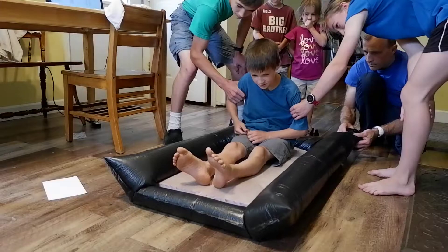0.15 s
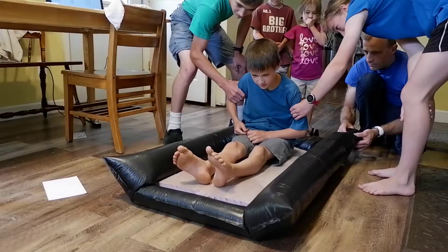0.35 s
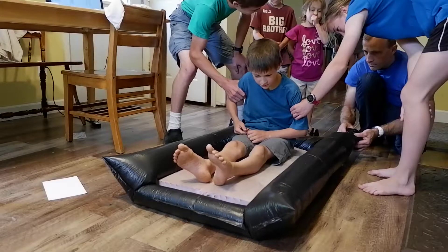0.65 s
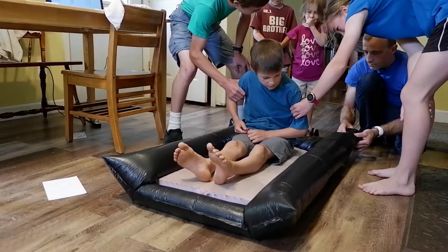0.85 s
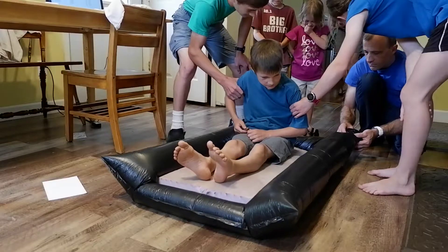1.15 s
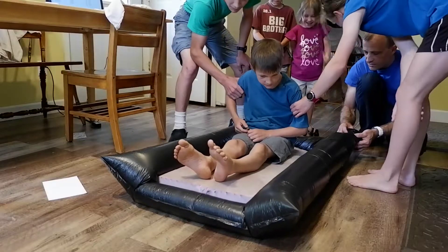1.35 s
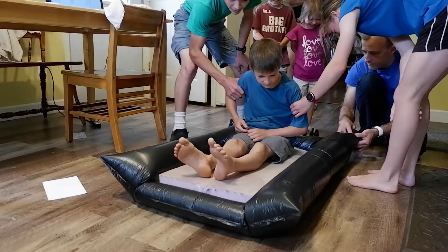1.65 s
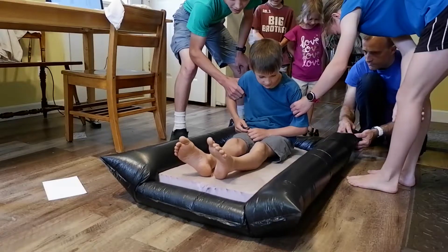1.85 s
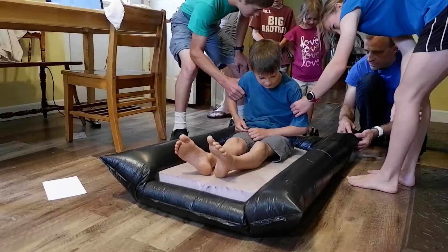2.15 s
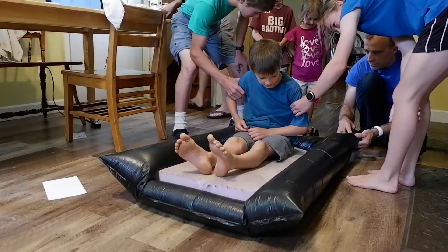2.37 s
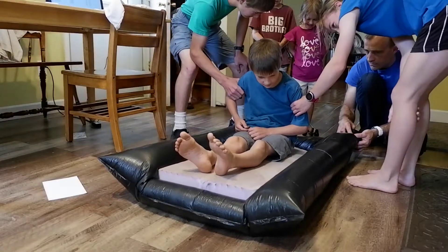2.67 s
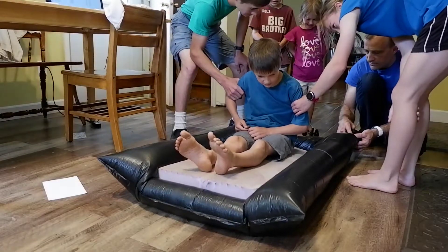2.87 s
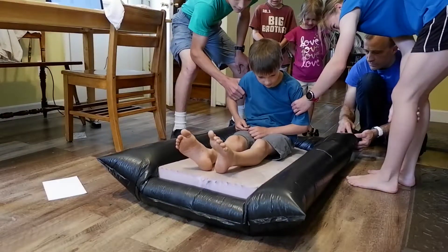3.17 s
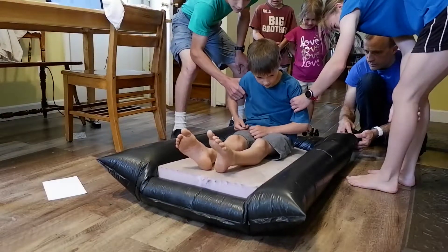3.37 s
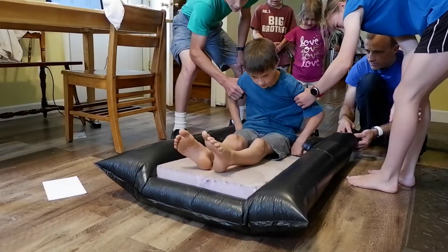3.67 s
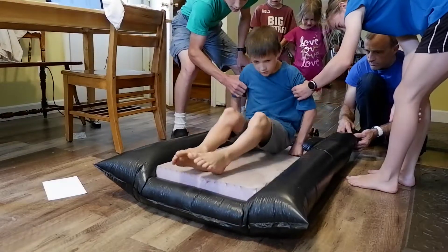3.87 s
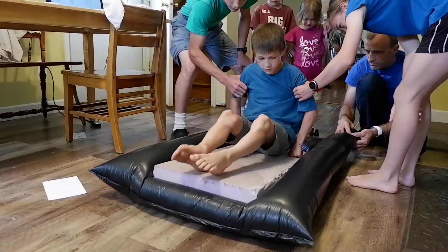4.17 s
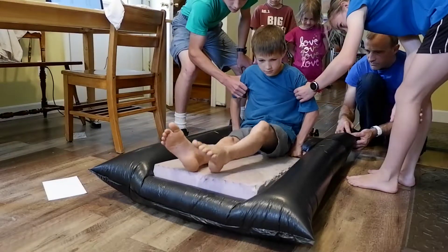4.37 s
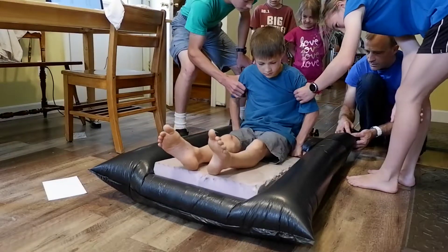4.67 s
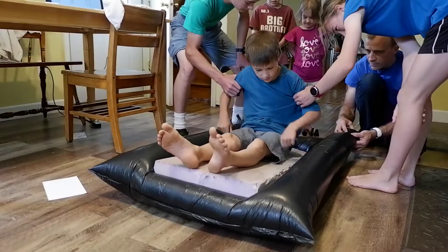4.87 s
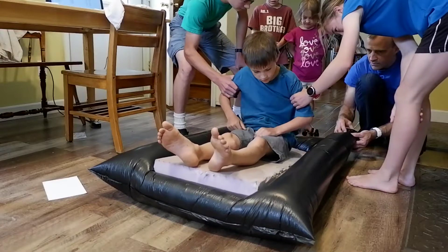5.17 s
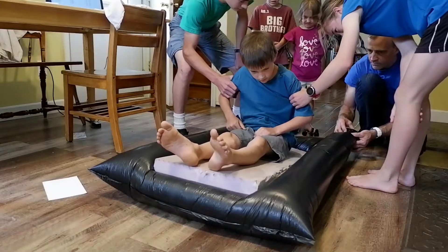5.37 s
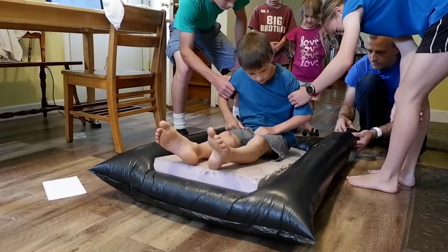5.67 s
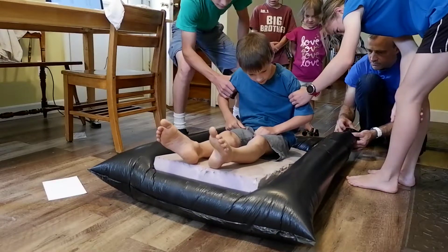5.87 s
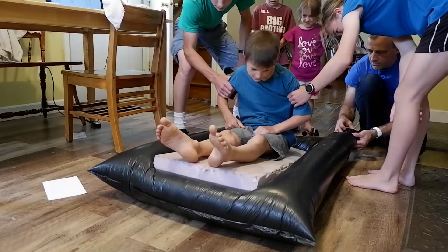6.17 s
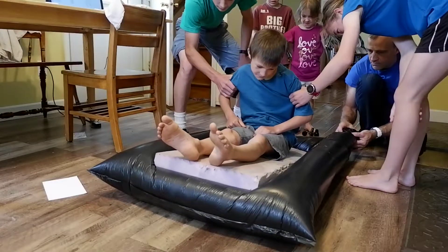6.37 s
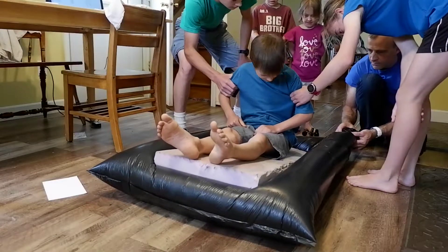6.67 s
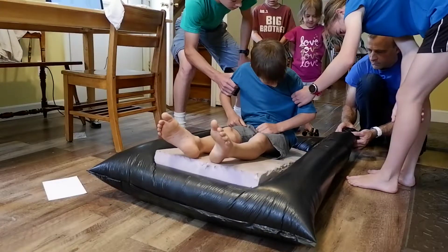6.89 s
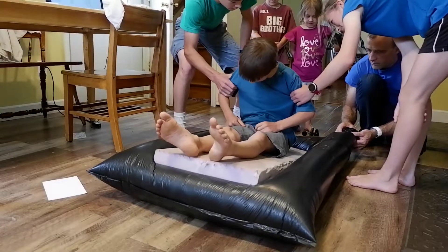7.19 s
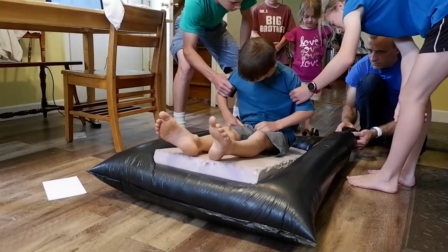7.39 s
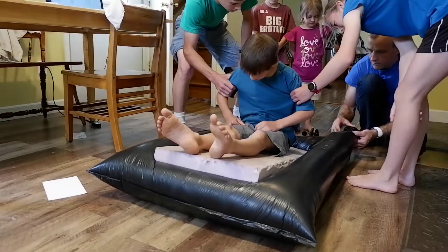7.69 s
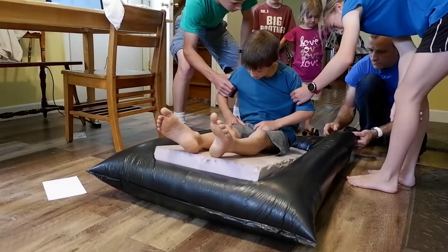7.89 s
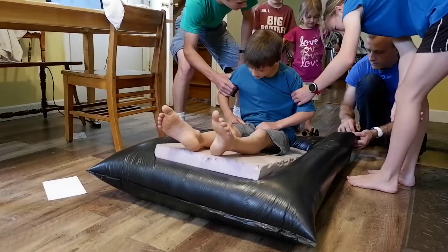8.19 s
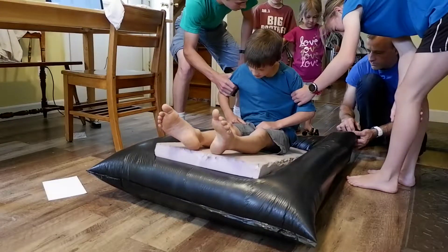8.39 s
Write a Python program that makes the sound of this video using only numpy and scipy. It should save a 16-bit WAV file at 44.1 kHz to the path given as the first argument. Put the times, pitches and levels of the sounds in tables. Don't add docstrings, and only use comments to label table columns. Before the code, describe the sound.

A small electric inflator whines and roars steadily indoors, its pitch creeping upward, while plastic rustles, creases and knocks twice on a wooden floor.

```python
import sys
import numpy as np
from scipy import signal
from scipy.io import wavfile
from scipy.ndimage import uniform_filter1d

SR = 44100
rng = np.random.default_rng(int(sys.argv[2]) if len(sys.argv) > 2 else 0)


def field_ratio(decibels):
    return 10 ** (np.asarray(decibels, dtype=float) / 20)


def master_out(mix):
    frames = np.transpose(np.atleast_2d(mix))
    ceiling = np.clip(frames, -1, 1)
    pcm = np.round(ceiling * 32767).astype(np.int16)
    wavfile.write(sys.argv[1], SR, pcm)


N = 376613

# (frequency [Hz], left-right likeness [0..1])
STEREO_LIKENESS = [(60, 0.76), (130, 0.8), (290, 0.89), (640, 0.98), (1410, 0.86), (3100, 0.8),
                   (6800, 0.54), (11000, 0.07), (14800, 0.17), (15000, 0.59)]
# (frequency [Hz], left over right [dB])
STEREO_LEAN = [(60, -6), (180, 0), (550, 0), (1650, -2.5), (4970, -0.5), (15000, 1.5)]

# (start [s], hold [s], level [dB])
RUSTLES = [
    (3.55, 0.37, -50),
    (4.237, 0.34, -43),
    (4.7, 0.24, -41),
    (8.082, 0.26, -53),
]
# (frequency [Hz], level [dB per Hz])
RUSTLE_COLOUR = [(60, -45), (150, -2), (400, 4), (850, 9), (1300, -14), (3000, -20), (9000, -17),
                 (12000, -50)]
# (time [s], peak [dB], first pitch [Hz], noise width [Hz], T60 [s])
THUMPS = [
    (4.684, -27, 1510, 1600, 0.025),
    (4.687, -17, 916, 1000, 0.035),
    (4.69, -26, 398, 400, 0.19),
    (4.704, -21, 760, 1200, 0.045),
    (4.715, -35, 700, 1200, .25),
    (6.023, -24.5, 780, 400, 0.12),
    (6.039, -20.5, 586, 600, 0.059),
    (6.039, -36, 175, 200, 0.18),
    (6.06, -28.5, 520, 500, 0.3),
]
# (time [s], level [dB], T60 [s])
CREASES = [
    (3.029, -45, 0.21),
    (3.085, -56, .1),
    (3.225, -47, .3),
    (4.65, -56, .3),
    (4.686, -43, 0.16),
]

# (time [s], level [dB])
AIR_FLOW = [(0, -39), (1.4, -38), (2.8, -37.8), (4.8, -36.5), (5.3, -39.5), (5.8, -37), (6.3, -38),
            (8.54, -37.5)]
# (frequency [Hz], level [dB per Hz])
AIR_COLOUR = [(62, -34), (80, -24), (130, -17.5), (340, -21), (640, -17.5), (700, -8), (1200, -8.5),
              (1230, -11.5), (1500, -19), (2000, -15), (5200, -18.5), (6000, -26), (9500, -34),
              (11300, -43.5)]
# (centre [Hz], width
# [Hz], boost with slack bag [dB], with tight bag [dB])
HOUSING = [(450, 103, 7, 2.5), (793, 140, -2.5, -4.5), (1082, 40, 10, 9), (1175.5, 35, 8, 8),
           (1535, 100, 5.5, -0.5), (1750, 270, -1, 7), (1950, 280, 6.5, -6.5), (2466, 107, 9, 7.5),
           (2612, 140, 9, 3), (2990, 110, -3.5, -7), (3286, 280, 4, -2), (3760, 165, -7.5, -4.5),
           (4140, 400, -3.5, 4.5), (4390, 420, 4, 2.5), (15400, 700, 3, 3)]

# (time [s], turns per second [Hz])
SHAFT_SPEED = [(0.0, 138.36), (0.92, 139.76), (1.52, 140.17), (2.44, 140.83), (2.74, 141.34),
               (3.36, 141.96), (3.96, 143.03), (4.27, 143.35), (4.58, 144.17), (5.18, 146.57),
               (5.49, 147.29), (6.1, 149.33), (7.02, 151.2), (7.93, 152.81), (8.54, 153.62)]
# (shaft order, level [dB])
ORDER_STRENGTH = [(3, 2), (4, -5), (5, 8), (6, -1), (7, 1), (8, -3), (9, 3), (10, 5), (11, 2), (12, 2),
                  (13, 0), (14, -1), (15, 0), (16, -2), (17, 5), (18, 0), (19, 3), (20, 1), (21, 6),
                  (22, -2), (23, -3), (24, 0), (25, 1), (26, -3), (27, 5), (28, 0), (29, -2), (30, -6),
                  (31, -3), (32, -1)]
# (frequency [Hz], level [dB])
ORDER_BED = [(140, -74.5), (420, -64.5), (700, -64), (1800, -60), (3600, -59.5), (5000, -57.5), (6500, -71),
             (9500, -77)]
# (frequency [Hz], half width [Hz], order
# level with slack bag [dB], with tight bag [dB], left over right [dB])
STANDING_WAVES = [(418.2, 3.4, -58, -58, 1), (703.5, 5.8, -61.5, -62, 0.5), (751, 12, -52.5, -52.5, 0.5),
                  (872, 18.5, -41, -41, 1), (881, 4, -40, -43.5, 2), (923, 5.4, -50, -52, -2),
                  (1126, 5.7, -44, -47, -1), (1160, 5.1, -43, -43, -1), (1189, 2.7, -41, -40, -2),
                  (1261, 4.8, -54, -55, -2), (1403, 5.7, -49.5, -47, 2.5), (1489, 6.2, -49, -45.5, 2),
                  (1515, 3.4, -53, -56.5, 5), (1533, 2.5, -51, -60, 4),
                  (1600, 8.9, -47, -48, 2), (1690, 3.2, -39.5, -53, -1), (1710, 4.8, -48.5, -41, 1.5),
             (1734.7, 12.7, -40.5, -42, -2), (1779, 11.6, -39.5, -37, -1), (1837, 20.6, -49, -50, -4),
             (1923, 13, -45, -54, 0), (1938, 2.2, -42.5, -52, 1), (1950, 3.0, -57, -47, 2),
             (1984, 3.9, -56, -47.5, 3), (2088, 5.4, -46, -62, -6), (2141, 11, -59, -49, 3),
             (2253, 14, -57, -48, 2), (2470, 35, -53.5, -47, 2),
                  (2675, 2.8, -49, -46, -2), (2708, 6.6, -43.5, -62, -1), (2940, 9.3, -53, -56, -1.5),
              (3163, 2.9, -58, -50, 1), (3267, 17, -51, -48, -3), (3375, 28, -57, -63, -5),
              (3420, 3.5, -45, -50, -6), (3450, 16, -56, -54, -3), (3497, 13, -48, -60, 0),
              (3607, 50, -52, -57.5, 0), (3875, 25, -49, -49, 0), (4290, 57, -60, -55, -2),
              (4460, 50, -61, -50, -4), (4883, 8.6, -63, -45, -2)]


def evened(x):
    return x / np.sqrt(np.mean(x ** 2) + 1e-20)


def read(points, hz):
    f, value = np.transpose(points)
    return np.interp(np.log(hz + 1), np.log(f + 1), value)


def drift(rate_hz, count, size=64):
    knots = rng.standard_normal((count, 200))
    at = np.arange(0, N, size) / SR * min(rate_hz, 20)
    return np.array([np.interp(at, np.arange(200), row) for row in knots])


def band(x, low_hz, high_hz):
    sos = signal.butter(2, [max(low_hz, 40), high_hz], "band", fs=SR, output="sos")
    return signal.sosfilt(sos, x)


def stereo_noise(field_db):
    hz = np.fft.rfftfreq(2048, 1 / SR)
    a, b, c, d = rng.standard_normal((field_db.shape[1], 1025, 4)).T
    likeness = np.clip(read(STEREO_LIKENESS, hz), 0, 1)
    apart = np.sqrt((1 - likeness) / 2)[:, None]
    mid = np.sqrt(1 - apart ** 2) * (a + 1j * b)
    side = apart * (c + 1j * d)
    lean = field_ratio(read(STEREO_LEAN, hz) / 2)[:, None]
    z = np.array([(mid + side) * lean, (mid - side) / lean]) * field_ratio(field_db)
    return signal.istft(z, nperseg=2048, noverlap=1536)[1][:, :N]


def tightness(speed):
    return (speed - speed.min()) / np.ptp(speed)


def mains_hum(hum_hz=60.5, level_db=-62.5):
    hum = np.sqrt(2) * field_ratio(level_db) * np.sin(2 * np.pi * hum_hz * np.arange(N) / SR)
    return hum * field_ratio([[-1.], [1.]])


def rustle(flicker_db=1.5, slide_in_s=0.092, slide_out_s=0.092, creep_db=-56):
    t = np.arange(N) / SR
    hz = np.fft.rfftfreq(2048, 1 / SR)
    slide = evened(stereo_noise(read(RUSTLE_COLOUR, hz)[:, None] + np.zeros(N // 512 + 5)))
    weight = field_ratio(creep_db)
    for start, hold, db in RUSTLES:
        swell = (t - start) / slide_in_s
        fade = (start + hold - t) / slide_out_s
        weight = weight + field_ratio(db) * np.exp(np.minimum(np.minimum(swell, fade), 0))
    return slide * weight * field_ratio(flicker_db * drift(19., count=1, size=1))


def creases():
    out, t = np.zeros((2, N)), np.arange(SR // 3) / SR
    for start, db, t60 in CREASES:
        a, b = rng.standard_normal((2, len(t)))
        pair = np.array([a + .5 * b, a - .5 * b])
        crackle = evened(band(band(pair, 5200, 10000), 4500, 10000))
        out[:, round(start * SR):][:, :len(t)] += crackle * field_ratio(db - 60 * t / t60)
    return out


def thumps(ring_share=0.59, pitch_sag=0.706):
    out, t = np.zeros((2, N)), np.arange(SR // 3) / SR
    for start, db, hz, width, t60 in THUMPS:
        shape = field_ratio(-60 * t / t60) * (1 - np.exp(-t / 0.0015))
        pitch = hz * (pitch_sag + (1 - pitch_sag) * np.exp(-6. * t / t60))
        ring = np.exp(-t / 0.017) * np.sin(2 * np.pi * np.cumsum(pitch) / SR)
        puff = evened(band(rng.standard_normal(len(t)), hz - width / 2, hz + width / 2))
        blow = shape * (ring_share * ring + (1 - ring_share) * 1.1 * puff)
        blow = band(blow, 0.45 * hz, 6000)
        out[:, round(start * SR):][:, :len(t)] += field_ratio(db) * blow / abs(blow).max()
    return out


def air_rush(ripple_db=2.5, patchy_db=1.06, tilt_hz=1500, tight_tilt_db=0.2):
    hz, t = np.fft.rfftfreq(2048, 1 / SR), np.arange(N // 512 + 5) * 512 / SR
    tight = tightness(np.interp(t, *np.transpose(SHAFT_SPEED)))

    colour = read(AIR_COLOUR, hz)[:, None] - 7.4 * (hz < 45)[:, None]
    for centre, width, slack_db, tight_db in HOUSING:
        boost = slack_db + tight * (tight_db - slack_db)
        colour = colour + boost / (1 + (2 * (hz[:, None] - centre) / width) ** 2)
    upper = (hz ** 2 / (hz ** 2 + tilt_hz ** 2))[:, None] * tight * tight_tilt_db

    ripple = evened(uniform_filter1d(rng.standard_normal(1025), size=2))
    ripple = ripple * hz / (hz + 1200)
    patches = rng.standard_normal((len(t), 1025)).T
    patches = uniform_filter1d(uniform_filter1d(patches, size=12, axis=0), size=30, axis=1)
    patches = evened(patches)

    flow_s, flow_db = np.transpose(AIR_FLOW)
    follow = .3 + .7 / (1 + ((hz - 1100) / 400) ** 2)
    swing = follow[:, None] * (np.interp(t, flow_s, flow_db) - flow_db.mean())
    air = stereo_noise(colour + ripple_db * ripple[:, None] + patchy_db * patches + upper + swing)
    return air * field_ratio(flow_db.mean()) / np.std(band(air.mean(0), 964, 1233))


def motor(waver_db=2.0, bed_swing_db=4.5, bed_lean_db=7.0, wobble_rad=0.054, swell_db=0.2, spread=1.7,
          wave_spacing_hz=9):
    t = np.arange(N) / SR
    speed = np.interp(t, *np.transpose(SHAFT_SPEED))
    angle = 2 * np.pi * np.cumsum(speed) / SR + wobble_rad * drift(9., count=1, size=1)[0]
    orders = np.arange(1, 69)
    sides = np.array([.5, -.5])[:, None, None]
    hz = orders[:, None] * speed[::64]
    tight = tightness(speed)[::64]

    bumps = rng.standard_normal((2000, 2)).T
    both, apart = [np.interp(hz / wave_spacing_hz, np.arange(2000), row) for row in bumps]
    level = field_ratio(read(ORDER_BED, hz) + bed_swing_db * both + bed_lean_db * sides * apart)
    for wave_hz, half, slack_db, tight_db, lean_db in STANDING_WAVES:
        db = slack_db + tight * (tight_db - slack_db)
        near = abs(hz - wave_hz).min(axis=1) < 4 * half
        bell = np.exp(-.5 * ((hz[near] - wave_hz) / half) ** 2)
        level[:, near] += bell * field_ratio(db + swell_db + spread * lean_db * sides)
    strength_db = np.interp(orders, *np.transpose(ORDER_STRENGTH))[:, None]
    level = level * field_ratio(strength_db + waver_db * drift(12., count=68))

    out, start = np.zeros((2, N)), np.exp(2j * np.pi * rng.random(68))
    turn = step = np.exp(1j * angle)
    for k in orders:
        sine = (turn * start[k - 1]).real
        out += np.repeat(level[:, k - 1], 64, axis=1)[:, :N] * sine
        turn = turn * step
    return np.sqrt(2) * out


def scene():
    return mains_hum() + rustle() + creases() + thumps() + air_rush() + motor()


def top_cut(x):
    return signal.sosfilt(signal.butter(12, 16930, fs=SR, output="sos"), x)


def record(dry, hiss_db=-58, offset=-0.0011, edge_hz=15740):
    hiss = band(band(rng.standard_normal((2, N)), 3000, 15000), 3000, 15000)
    hiss = hiss * field_ratio(.7 * drift(2.35, count=1, size=1))
    heard = dry + field_ratio(hiss_db) * hiss + offset * field_ratio([[1.5], [-1.5]])
    low_pass = signal.firwin(1023, edge_hz, window=("kaiser", 10), fs=SR)
    return top_cut(signal.oaconvolve(heard, low_pass[None], "same"))


dry = scene()
out = record(dry)
master_out(out)
```